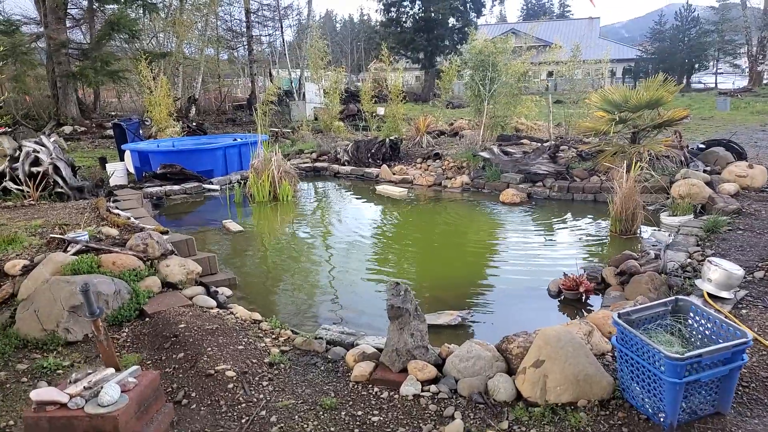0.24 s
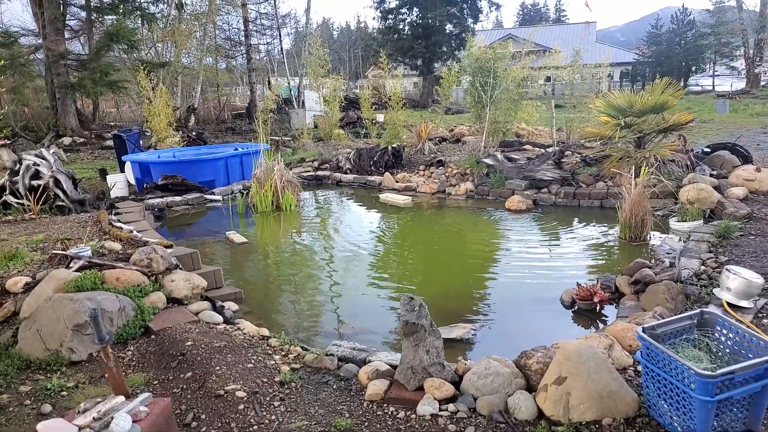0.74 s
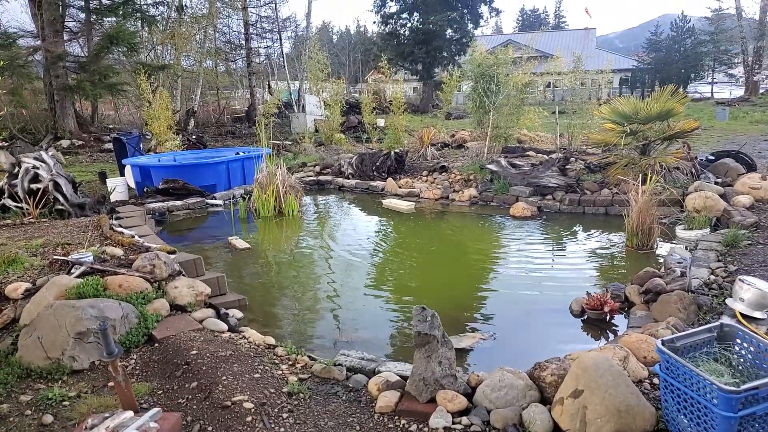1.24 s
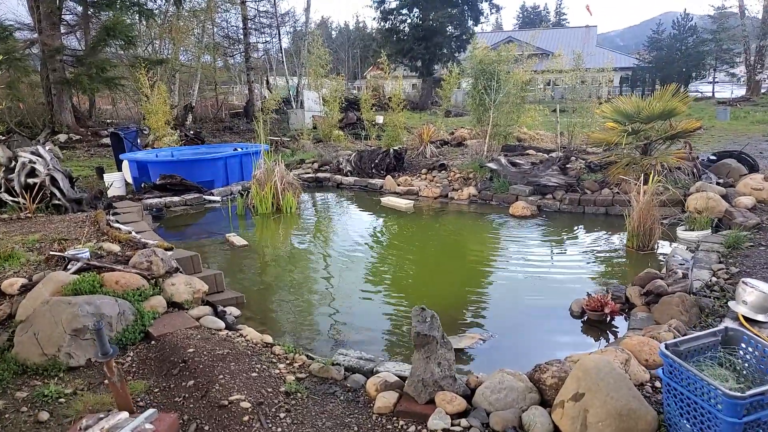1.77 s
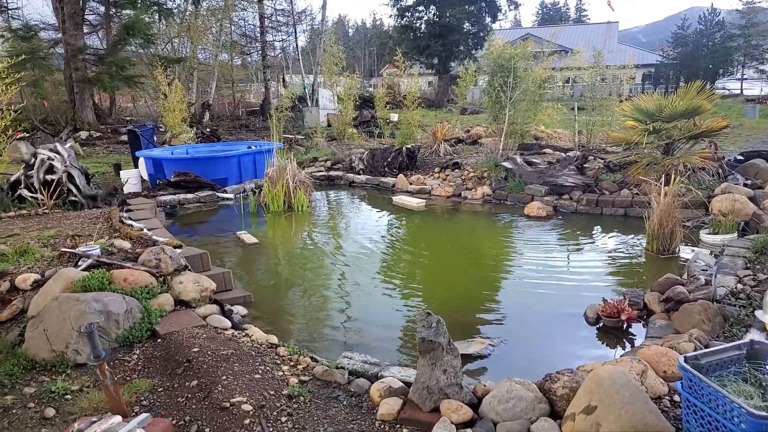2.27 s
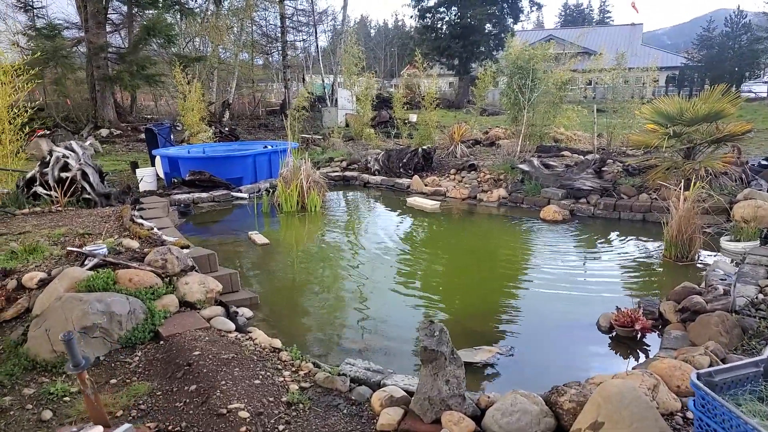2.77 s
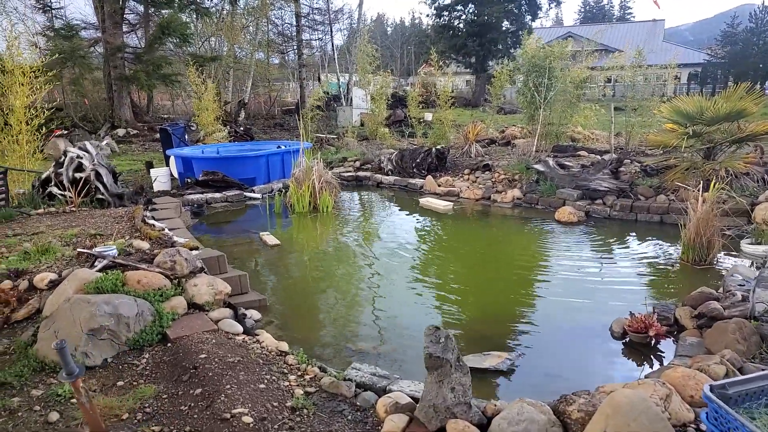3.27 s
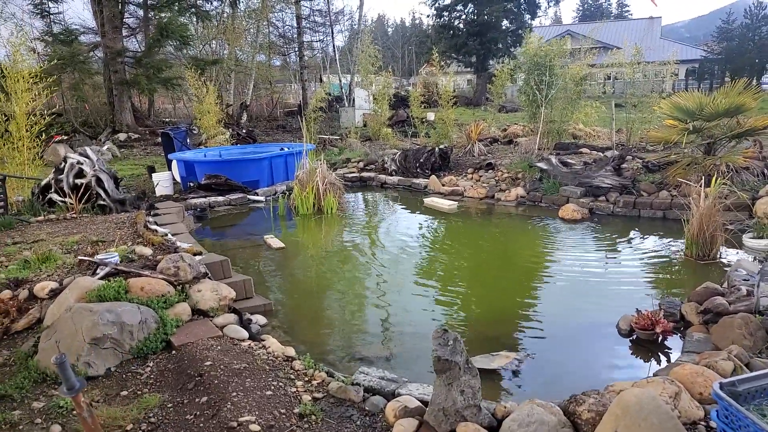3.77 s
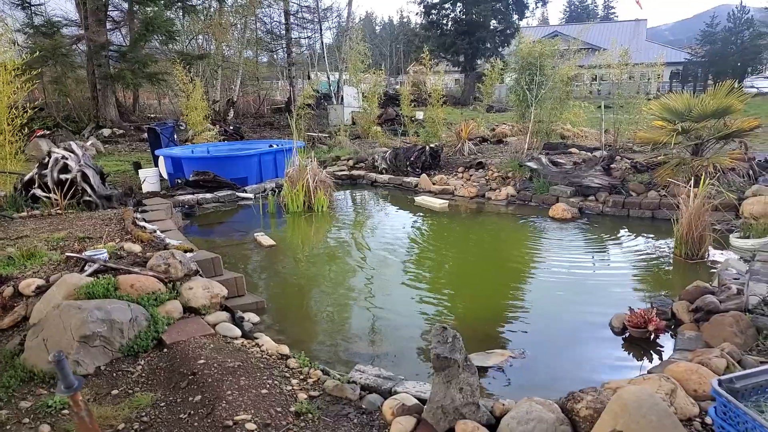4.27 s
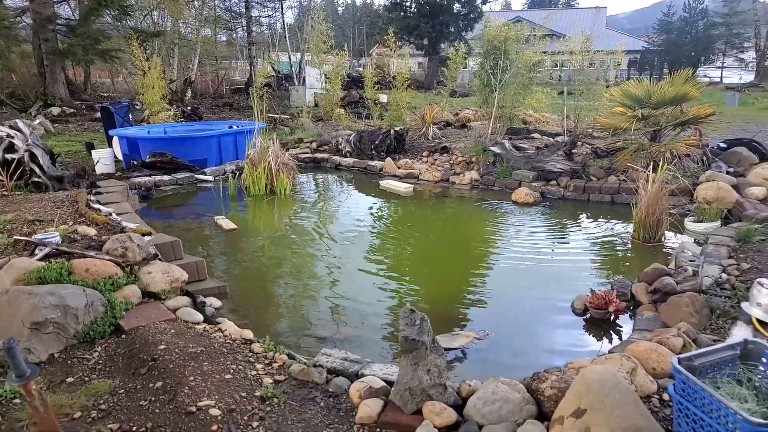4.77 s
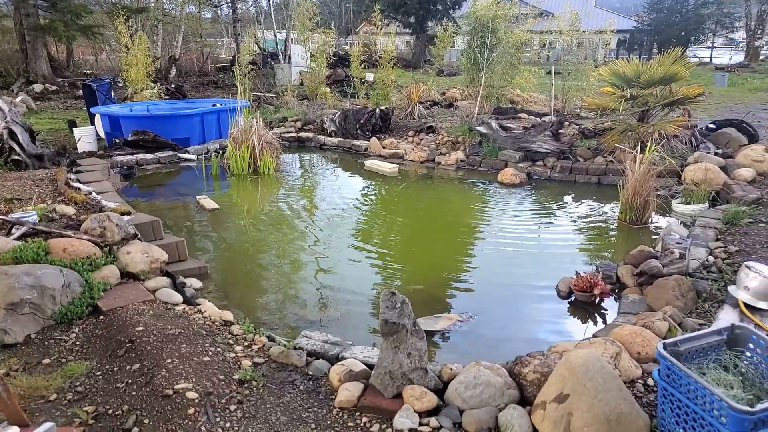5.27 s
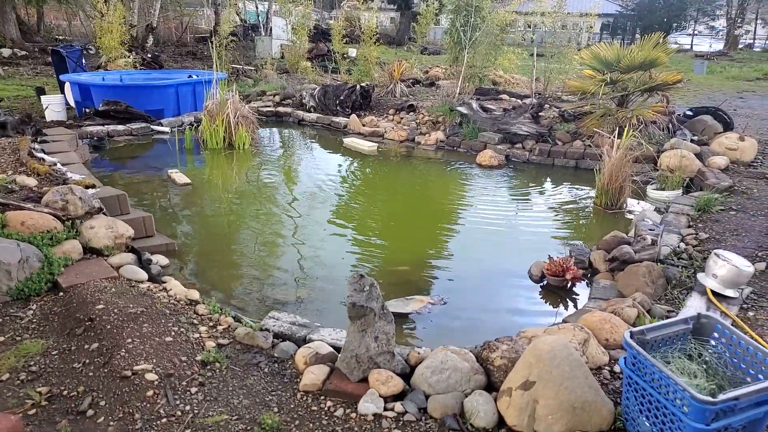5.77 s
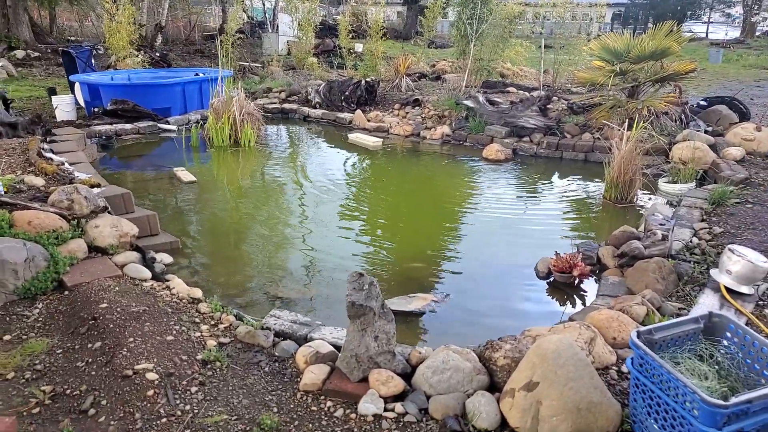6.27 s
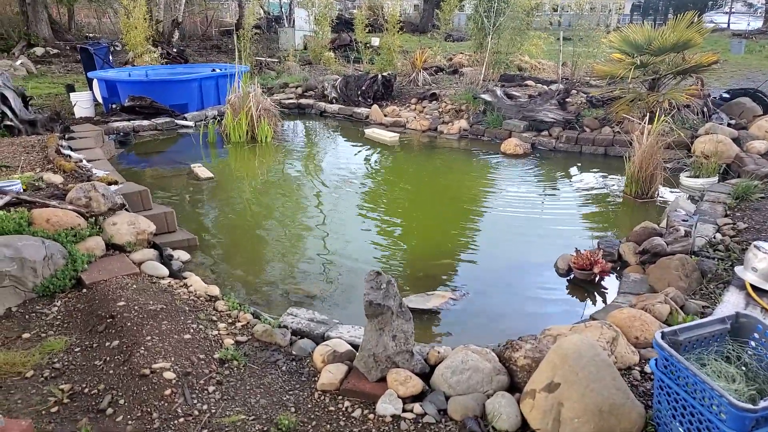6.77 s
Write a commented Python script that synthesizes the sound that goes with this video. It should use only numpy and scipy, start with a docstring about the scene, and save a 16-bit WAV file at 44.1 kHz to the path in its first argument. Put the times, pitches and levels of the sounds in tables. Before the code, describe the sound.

A quiet outdoor pond, heard through a hand-held stereo microphone. A near frog, slightly left, calls ribbit at about 0.2, 1.1, 2.0, 3.1, 3.9, 4.9 and 6.1 seconds: a rising, creaky rib of rapid pulses around 0.16 seconds long, then a brief, tighter bit, both ringing brightly near 2 kHz. A farther frog, lower, duller and softer, answers at 1.5, 2.5, 4.3, 5.5 and 6.7 seconds, with small grunts near 4.7 and 6.5. Rocks and trees add short scatter and a faint tail. Deep wind thumps flutter mainly from 0.9 to 2.3 seconds, the strongest near 1.5, lighter around 4 and almost calm after 5. A sleeve rubs and swishes softly throughout, mostly on the left, with a clearer airy swish around 4.5 and tiny ticks. A distant vehicle hum falls in pitch and fades, its road hush swelling gently around 2 to 3 seconds.

```python
"""Amid wind buffeting, a sleeve's rustle and a distant vehicle's hum, two frogs call "rib-bit" in turn.
The near frog's vocal sac rings on the second harmonic; the far one, its sac slack, croaks lower and duller.
Each syllable is a train of tone pulses from the larynx; rocks, a house and trees return delayed copies.
Wind and fabric are shaped noise on the two ports of a hand-held phone; the engine is a sum of shaft orders."""
import sys
import numpy as np
from scipy import signal
from scipy.fft import rfft, irfft
from scipy.io import wavfile
from scipy.ndimage import uniform_filter1d, map_coordinates

SR = 44100
rng = np.random.default_rng(int(sys.argv[2]) if len(sys.argv) > 2 else 0)


def unload_audio(sound):
    """Save the sound as a 16-bit wav file, at the path given as the first command line argument."""
    columns = np.transpose(np.atleast_2d(sound))
    # keep every value between -1 and 1, then stretch to whole-number steps
    steps = np.round(np.clip(columns, -1, 1) * 32767)
    wavfile.write(sys.argv[1], SR, steps.astype(np.int16))


N = 309582
TIME = np.arange(N) / SR
SIDES = np.array([[1], [-1]])  # left, right


def undb(db):
    """Amplitude ratio: a level in decibels becomes a linear gain."""
    return 10 ** (np.asarray(db) / 20)


def unit(x):
    """Normalisation: scale to an rms of 1."""
    return x / np.sqrt(np.mean(x ** 2) + 1e-20)


def follow(table, at):
    """Linear interpolation: join each column by straight lines along the first."""
    first, *columns = np.transpose(table)
    return [np.interp(at, first, column) for column in columns]


def colour(x, points):
    """Spectral filtering: weight x by (frequency [Hz], gain [dB]) points on a logarithmic axis."""
    size = x.shape[-1]
    hz, db = np.transpose(points)
    log_hz = np.log(np.fft.rfftfreq(size, 1 / SR) + 1)
    gain = undb(np.interp(log_hz, np.log(hz), db))
    return irfft(rfft(x) * gain, size)


def noise(points, channels=2):
    """Incoherent sources: independent coloured noise in each channel, with a joint rms of 1."""
    return unit(colour(rng.standard_normal((channels, N)), points))


def resonate(x, hz, width_hz):
    """Resonance: a single mode passes a band around its natural frequency."""
    return signal.lfilter(*signal.iirpeak(hz, hz / width_hz, fs=SR), x)


def walk(rate, size=N):
    """Slow random modulation: held random steps, smoothed twice, with a spread near 1."""
    hold = int(SR / rate)
    steps = np.repeat(rng.standard_normal(size // hold + 1), hold)
    smooth = uniform_filter1d(uniform_filter1d(steps, hold), hold)
    return smooth[:size] * np.sqrt(2)


def add(out, start, x):
    """Superposition: mix x into out from a start time in seconds."""
    i = max(int(start * SR), 0)
    out[i:i + len(x)] += x[:N - i]


# Spectrum of the quiet air: (frequency [Hz], relative level [dB])
AIR_SPECTRUM = [(350, -29.5), (600, -3), (706, -7), (820, 1), (1560, -7.5), (2160, -2), (2500, -19),
                (3520, -18.5), (7540, -29), (15500, -22.5)]


def quiet_air():
    """Diffuse background: steady noise, independent at the two ports."""
    return undb(-68.5) * noise(AIR_SPECTRUM)


def faint_hum():
    """Pure tone: one steady frequency whose level wavers slightly around -75 dB rms."""
    return unit(np.sin(2 * np.pi * 246.5 * TIME)) * undb(-75 + 2 * walk(5))


# Distant vehicle: (time [s], third shaft order [Hz], relative hum level [dB], relative road noise level [dB])
VEHICLE_COURSE = [(0, 161.3, -53.5, -72), (.8, 161.6, -51, -75), (1.7, 158.3, -58, -66),
                  (2.7, 155.1, -57, -62), (3.6, 143.4, -63, -68.5), (4.4, 131, -68.5, -68.5),
                  (5.4, 129.3, -56, -77.5), (6.3, 122.4, -63, -77.5), (7, 119.6, -68, -83.5)]
# Harmonics of the engine shaft: (shaft order [1], relative level [dB])
ENGINE_ORDERS = [(2, -22.5), (3, -2.5), (4, -15)]
# Spectrum of the road noise: (frequency [Hz], relative level [dB])
ROAD_SPECTRUM = [(100, -7), (190, -5), (250, 1), (380, 7), (600, -1), (1000, -11), (2000, -18.5),
                 (4000, -47.5)]


def vehicle(road_gain_db=5, hum_left_db=2, road_left_db=-10):
    """Harmonic source plus broadband noise: the engine hum sinks in pitch as road noise swells and fades."""
    hz, hum_db, road_db = follow(VEHICLE_COURSE, TIME)
    shaft_hz = hz * (1 + 0.0078 * walk(9.2)) / round(ENGINE_ORDERS[1][0])
    shaft = 2 * np.pi * np.cumsum(shaft_hz) / SR
    hum = np.zeros(N)
    for order, db in ENGINE_ORDERS:
        tone = unit(np.sin(round(order) * shaft))
        hum += tone * undb(hum_db + db + 2.5 * walk(5.5))
    road = noise(ROAD_SPECTRUM) * undb(road_db + road_gain_db + 2.88 * walk(6.8))
    # each left_db is the level difference, left minus right
    return hum * undb(hum_left_db * SIDES / 2) + road * undb(road_left_db * SIDES / 2)


# Spectrum of wind on a port: (frequency [Hz], relative level [dB])
WIND_SPECTRUM = [(15, -24.5), (25, -14), (42, -1.5), (60, 4.5), (90, -1), (130, -6), (200, -17.5),
                 (300, -23.5), (500, -46.5), (900, -87)]
# Steady breeze on the exposed left port: (time [s], relative level [dB])
BREEZE_COURSE = [(0.0, -44.5), (0.82, -51.5), (1.08, -40), (1.33, -44.5), (2.05, -43), (2.29, -47.5),
                 (2.77, -41.5), (3.66, -51.5), (4.4, -49.5), (5.1, -58.5), (5.81, -60), (6.3, -52.5),
                 (6.57, -61.5), (7.02, -63.5)]
# Eddies sweeping over the phone: (middle [s], length [s], relative level [dB], left minus right [dB])
PASSING_EDDIES = [(0.098, 0.037, -49, 5), (0.238, 0.0315, -39.5, -5), (0.682, 0.075, -42.5, -4.5),
                  (0.956, 0.0955, -32, -2), (1.061, 0.018, -34, -3.5), (1.161, 0.0258, -32.5, -4.5),
                  (1.526, 0.0257, -22.5, -4), (1.606, 0.1, -35, 6), (2.154, 0.0695, -39, 13.5),
                  (2.235, 0.0494, -29, -3.5), (2.786, 0.0266, -46, 27), (3.155, 0.083, -42.5, 10),
                  (3.686, 0.023, -37.5, 12), (3.955, 0.0775, -36.5, 4.5), (4.558, 0.101, -50, 21),
                  (5.45, 0.41, -62, -8.5), (6.103, 0.336, -58.5, 1), (6.334, 0.07, -47, -3.5),
                  (6.793, 0.0752, -48.5, 3.5)]


def wind(shared=0.54, flutter_db=3.0, breeze_db=6.5, shelter_db=-32):
    """Turbulent pressure: breeze and eddy powers add; the noise at the two ports is partly coherent."""
    breeze, = follow(BREEZE_COURSE, TIME)
    shelter = np.array([[0], [shelter_db]])  # the right port lies sheltered
    power = undb(breeze + breeze_db + shelter + flutter_db * walk(20)) ** 2
    for middle, length, db, left_db in PASSING_EDDIES:
        swell = np.exp(-2 * ((TIME - middle) / length) ** 2)
        power = power + (swell * undb(db + left_db * SIDES / 2)) ** 2
    common, *own = noise(WIND_SPECTRUM, channels=3)
    # shared is the fraction of power common to both ports
    turbulence = np.sqrt(shared) * common + np.sqrt(1 - shared) * np.array(own)
    return turbulence * np.sqrt(power)


# Spectra of the low rub and the high swish: (frequency [Hz], relative level [dB])
RUB_SPECTRUM = [(2500, -1.5), (3800, 0.5), (4900, 1.5), (6800, -4.5), (8500, -12.5), (12000, -23)]
SWISH_SPECTRUM = [(3000, -19), (4500, -6.5), (6000, -10.5), (10000, -1), (13000, 5.5), (15500, 0.5)]
# Light contact of the fabric between strokes: (time [s], relative level [dB])
LIGHT_CONTACT = [(0, -79.5), (1.7, -81), (3, -76.5), (6.3, -74.5), (6.65, -86.5), (7.02, -91.5)]
# Strokes: (start [s], length [s], relative low rub level [dB], rub centre [Hz], relative swish level [dB])
SLEEVE_STROKES = [(0, 0.204, -67.5, 5020, -88), (0.322, 0.664, -77.5, 6914, -68.5),
                  (.8, 0.646, -74.5, 6580, -99), (2.56, 0.352, -72.5, 4890, -79),
                  (3.596, 0.7, -78.5, 5050, -86.5), (4.317, 0.67, -68.5, 4390, -58.5),
                  (4.952, 0.383, -68, 4340, -74), (5.327, 0.62, -77, 4600, -71.5),
                  (6.035, 0.24, -65.5, 6290, -84.5)]
# Small creases of the fabric: (time [s], relative peak [dB])
FABRIC_CREASES = [(0.6458, -49.5), (0.659, -52.5), (0.829, -53.5), (2.4647, -57), (2.752, -50.5),
                  (2.7889, -52.5), (5.455, -47), (5.4778, -51.5), (6.3967, -56.5)]


def sleeve(rub_db=-1, swish_db=-2, ring_db=-1, ring_width_hz=450, contact_swish_db=-8, crease_db=-3,
           side_db=5.5, grain_db=2, attack_s=0.191, release_s=0.1265, fade_db_per_s=16,
           crease_decay_s=0.00135):
    """Friction noise: fabric slides in strokes that swell, slow and stop; creases tick as damped bursts."""
    rub = noise(RUB_SPECTRUM) * undb(rub_db)
    swish = noise(SWISH_SPECTRUM) * undb(swish_db)
    contact_db, = follow(LIGHT_CONTACT, TIME)
    slide = undb(contact_db) * (rub + undb(contact_swish_db) * swish)
    weave = rng.standard_normal((2, N))
    for start, length, low_db, hz, high_db in SLEEVE_STROKES:
        age = np.clip(TIME - start, 0, length)
        speed = np.minimum(age / attack_s, 1) * np.minimum((length - age) / release_s, 1)
        speed = speed * undb(-fade_db_per_s * age)
        ring = unit(resonate(weave, hz, ring_width_hz)) * undb(ring_db)
        slide = slide + speed * (undb(low_db) * (rub + ring) + undb(high_db) * swish)
    ticks = np.zeros(N)
    t = np.arange(SR // 50) / SR
    for start, db in FABRIC_CREASES:
        burst = rng.standard_normal(len(t)) * np.exp(-t / crease_decay_s)
        tick = resonate(burst, 7040, 6250)
        add(ticks, start, tick / np.abs(tick).max() * undb(db + crease_db))
    # left is raised and right lowered by side_db
    return (slide * undb(grain_db * walk(150)) + ticks) * undb(side_db * SIDES)


# Filtering by the trees: (frequency [Hz], gain [dB])
TREE_REFLECTION = [(500, -9.5), (1000, -14), (1750, -3), (2170, -0.5), (2700, -9), (3200, -11),
                   (12000, -11.5)]


def garden(x, left_db, lag_ms, rocks_db, house_db, house_s, trees_db, trees_t60_s=0.796, clump_db=4):
    """Reflection and reverberation: direct sound, rock scatter, a house echo and a fluttering tree tail."""
    t = np.arange(SR) / SR
    rocks, trees = rng.standard_normal((2, 2, SR))
    rocks = rocks * undb(-60 * t / .05) * (t > .001)  # reverberation time 0.05 s
    trees = colour(trees, TREE_REFLECTION)
    tail_db = -60 * t / trees_t60_s + clump_db * walk(90, size=SR)
    trees = trees * undb(tail_db) * np.minimum(t / 0.055, 1)
    paths = (undb(rocks_db) * unit(rocks) + undb(trees_db) * unit(trees)) / np.sqrt(SR)
    paths[:, int(house_s * SR)] += undb(house_db)
    # the right port hears the direct sound slightly later
    right = map_coordinates(x, [np.arange(N) - lag_ms * SR / 1000], order=3)
    direct = np.array([x, right]) * undb(left_db * SIDES / 2)
    return direct + signal.fftconvolve(x[None], paths, axes=1)[:, :N]


# How the frog's body radiates the fundamental: (frequency [Hz], gain [dB])
BODY_RADIATION = [(450, -16), (660, -6.5), (800, 5), (890, 0.5), (1040, -3.5), (1250, 1), (1700, -9.5),
                  (3000, -16.5)]
# The throat's upper resonance, which picks out the third harmonic: (frequency [Hz], gain [dB])
THROAT_RESONANCE = [(2000, -25.5), (2600, -8.5), (2950, 0), (3130, 0), (3260, -13), (3450, -22.5),
                    (4200, -25.5)]
# Rasp of the vocal folds: (frequency [Hz], relative level [dB])
RASP_SPECTRUM = [(400, -51), (750, 0), (1400, -1), (2500, 8.5), (3200, -4), (3700, -8.5), (5000, -20.5),
                 (8000, -27), (10000, -38.5), (15000, -50.5)]


def syllable(row, shape, slowing, sac_hz, sac_width_hz, third_db, upper_db, rasp_db, sag, jitter,
             high_band=None, high_band_db=-32, undertone_db=-2, undertone_ratio=.62, opening_s=0.001515,
             scatter_db=0.41, sac_peak=0.281):
    """Pulsed phonation: the larynx opens about 90 times a second, each time releasing a few cycles of tone."""
    _, length, rate, pitch_hz, level_db, sac_db = row
    t = np.arange(int((length + .03) * SR)) / SR
    share = t / length
    effort_db, bend, decay_s, leak_db = follow(shape, share)
    leak = undb(leak_db)
    count = rate * t * (1 - slowing * share / 2)
    pulse, cycle = count.astype(int), count % 1
    age = cycle / rate
    level_chance, pitch_chance = rng.standard_normal((32, 2))[pulse].T

    # each pulse swells and dies away; under high pressure the folds never quite shut
    opening = 1 - np.exp(-(age / opening_s) ** 2)
    gate = opening * np.exp(-np.maximum(age - opening_s, 0) / decay_s)
    closing = np.clip((length + .004 - t) / .004, 0, 1)
    effort = undb(effort_db + scatter_db * level_chance) * closing
    flow = uniform_filter1d(effort * (gate + leak), size=24)

    # the sac answers each pulse a little later with a rounder swell, and needs effort to get going
    hump = np.sin(np.interp(cycle, [0, sac_peak, 1], [0, np.pi / 2, np.pi])) ** 3
    swell = uniform_filter1d(effort ** 1.386 * (hump + leak / 2), size=24)

    # each pulse starts flat and rises to pitch; merged pulses hold it
    pulsed = np.clip(1 - leak, 0, 1)
    hz = pitch_hz * bend * (1 + pulsed * (jitter * pitch_chance - sag * np.exp(-age / 0.002)))
    phase = 2 * np.pi * np.cumsum(hz) / SR

    rasp_noise, band_noise = rng.standard_normal((2, len(t)))
    fundamental = colour(flow * np.sin(phase), BODY_RADIATION)
    sac = resonate(swell * np.sin(2 * phase), sac_hz, sac_width_hz)
    third = colour(flow * np.sin(3 * phase), THROAT_RESONANCE)
    overtones = flow * sum(np.sin(k * phase) / k ** 2 for k in range(4, 8))
    rasp = colour(rasp_noise * effort ** 0.594 * (gate + 0.13), RASP_SPECTRUM)

    # each part with its level above the fundamental [dB], set over the middle of the syllable
    parts = [(fundamental, 0), (sac, sac_db), (third, third_db), (overtones, upper_db), (rasp, rasp_db)]
    if high_band:
        # slow noise widens a gliding tone, and a second one below it, into narrow bands
        band_hz, loud_db = follow(high_band, share)
        waver = uniform_filter1d(band_noise, size=50)
        turn = 2 * np.pi * np.cumsum(band_hz) / SR
        pair = np.sin(turn) + undb(undertone_db) * np.sin(undertone_ratio * turn)
        parts.append((flow * undb(loud_db) * waver * pair, high_band_db))
    middle = (share > .35) & (share < .85)
    return sum(x / np.std(x[middle]) * undb(level_db + db) for x, db in parts)


# Far syllables: (start [s], length [s], starting pulse rate [1/s], pitch before bending [Hz],
# relative fundamental level [dB], vocal sac above fundamental [dB])
FAR_RIB_CALLS = [(1.4953, 0.1181, 82.95, 956.6, -47.5, 0), (2.503, 0.1365, 83.95, 960.9, -48, -3.5),
                 (4.326, 0.1223, 77.69, 916, -47.5, -4.5), (5.5117, 0.1253, 79, 896.9, -51.5, -5),
                 (6.6939, 0.0644, 86.27, 936.7, -49, -3)]
FAR_BIT_CALLS = [(1.683, 0.0625, 89.2, 1051, -46.5, -5), (2.7054, 0.0574, 94.92, 1059, -45, -5),
                 (4.511, 0.1125, 84.92, 1011, -44, -10.5), (5.707, 0.08185, 81.66, 1036, -47.5, -9.5),
                 (6.84, 0.0594, 94.5, 1038, -46.5, -9.5)]
# Course of a syllable: (share of length [1], relative level [dB], pitch ratio [1], pulse decay [s],
# leak between pulses [dB])
FAR_RIB_COURSE = [(0, -18.5, 1.2, 0.0014, -27.5), (0.3, -12, .96, 0.0013, -32),
                  (.55, -3, .98, 0.00076, -34.5), (.8, 0.5, 1.02, 0.001575, -33.5),
                  (1, -7, 1.0, 0.00035, -29)]
FAR_BIT_COURSE = [(0, -0.5, 0.986, 0.0015, -30), (.35, 0.5, 0.955, 0.0087, -22.5),
                  (0.603, -6.5, 0.998, 0.0033, -11), (.8, -11.5, 1.0, .003, -12),
                  (1, -22, 0.972, .003, -7.5)]
# Faint nasal band above the far croak, rising through each rib:
# (share of length [1], frequency [Hz], relative level [dB])
FAR_RIB_NASAL_BAND = [(0, 4521, -7), (1, 4860, 4.5)]
# Soft grunts: (start [s], relative peak [dB], pitch [Hz])
SOFT_GRUNTS = [(3.485, -73, 922), (4.727, -48, 1008), (6.528, -60, 966), (6.943, -62, 1044)]


def far_frog():
    """Heavily damped resonator: a slack sac dulls the lower croak; grunts are single damped pulses."""
    out = np.zeros(N)
    for row in FAR_RIB_CALLS:
        rib = syllable(row, FAR_RIB_COURSE, slowing=-.1, sac_hz=2100, sac_width_hz=1300, sac_peak=0.2,
                       third_db=-31, upper_db=-40, rasp_db=-22.5, sag=0.35, jitter=0.027,
                       high_band=FAR_RIB_NASAL_BAND, high_band_db=-29, undertone_db=-4, undertone_ratio=0.8)
        add(out, row[0], rib)
    for row in FAR_BIT_CALLS:
        bit = syllable(row, FAR_BIT_COURSE, slowing=0.1, sac_hz=2240, sac_width_hz=580, sac_peak=0.384,
                       third_db=-38.5, upper_db=-32.5, rasp_db=-15, sag=.16, jitter=0.047,
                       opening_s=0.00154, scatter_db=-0.94)
        add(out, row[0], bit)
    t = np.arange(SR // 20) / SR
    for start, db, hz in SOFT_GRUNTS:
        rise = t / 0.0042
        add(out, start, undb(db) * rise * np.exp(1 - rise) * np.sin(2 * np.pi * hz * t))
    return out


# Near syllables: (start [s], length [s], starting pulse rate [1/s], pitch before bending [Hz],
# relative fundamental level [dB], vocal sac above fundamental [dB])
NEAR_RIB_CALLS = [(0.2401, 0.1885, 89, 1055, -49, 17.5), (1.0552, 0.1684, 93.5, 1056, -47, 15),
                  (2.0211, 0.1602, 91.6, 1049, -48.5, 18.5), (3.0848, 0.1458, 84.3, 1057, -48, 17.5),
                  (3.857, .163, 91.6, 1051, -48, 11.5), (4.948, 0.1447, 89.8, 1064, -48.5, 9.5),
                  (6.1144, 0.1556, 93, 1042, -48.5, 7)]
NEAR_BIT_CALLS = [(0.4136, 0.10816, 88.95, 1080, -45, 16.38), (1.2264, 0.0857, 89.48, 1086, -44, 15.04),
                  (2.1944, 0.0992, 91.53, 1081, -43.5, 15.4), (3.261, 0.0834, 87.32, 1078, -44.5, 15.53),
                  (4.028, .091, 89.08, 1097, -44, 8.9), (5.121, 0.0849, 86.47, 1086, -46.5, 13.23),
                  (6.2855, 0.0903, 90.99, 1073, -46, 9.26)]
# Course of a syllable: (share of length [1], relative level [dB], pitch ratio [1], pulse decay [s],
# leak between pulses [dB])
NEAR_RIB_COURSE = [(0, -20.5, .93, 0.00088, -37.5), (0.201, -11, .97, 0.0017, -27.5),
                   (.45, -3.5, 1.005, 0.002, -27), (.65, -2, 1.02, 0.0025, -31),
                   (0.849, -5, 1.015, 0.0032, -35), (1.002, -12.5, 0.93, 0.0039, -35.5)]
NEAR_BIT_COURSE = [(0, -5, 1.01, 0.0017, -25.5), (0.25, -2, 1.01, 0.003, -24.5),
                   (0.5, 1.5, 1.03, 0.0024, -15.5), (0.7, -1, 1.0, 0.0017, -7.5),
                   (0.851, -8, .995, 0.0011, 0), (1, -32.5, 1.1, 0.0033, 3)]
# Thin whistle high above the near croak: (share of length [1], frequency [Hz], relative level [dB])
NEAR_RIB_WHISTLE = [(0, 13790, -30.5), (.6, 13690, -6), (1, 13210, 2.5)]
NEAR_BIT_WHISTLE = [(0, 13720, -4), (.55, 12760, 2), (1, 10660, 2)]


def near_frog():
    """Lightly damped resonator: a tight vocal sac rings on the second harmonic."""
    out = np.zeros(N)
    for row in NEAR_RIB_CALLS:
        rib = syllable(row, NEAR_RIB_COURSE, slowing=0.074, sac_hz=2202, sac_width_hz=190, sac_peak=0.283,
                       third_db=0, upper_db=-24.5, rasp_db=2.0, sag=.2, jitter=.008,
                       high_band=NEAR_RIB_WHISTLE, high_band_db=-30, undertone_db=3)
        add(out, row[0], rib)
    for row in NEAR_BIT_CALLS:
        bit = syllable(row, NEAR_BIT_COURSE, slowing=-.05, sac_hz=2162.4, sac_width_hz=144.32,
                       third_db=2, upper_db=-17.5, rasp_db=1.0, sag=0.20165, jitter=0.0084,
                       high_band=NEAR_BIT_WHISTLE, high_band_db=-26)
        add(out, row[0], bit)
    return out


def scene():
    """Superposition: background, wind, fabric and both frogs add at the two ports."""
    background = quiet_air() + faint_hum() + vehicle()
    far = undb(1.5) * garden(far_frog(), left_db=2.0, lag_ms=0.0616, rocks_db=-4.5,
                             house_db=-43, house_s=0.15, trees_db=-24.5)
    near = undb(2.5) * garden(near_frog(), left_db=3.5, lag_ms=0.0946, rocks_db=-8.5,
                              house_db=-41, house_s=0.088, trees_db=-32.0)
    return background + wind() + sleeve() + far + near


def record(dry):
    """Band limitation: a steep low-pass at the phone removes everything well above 15.7 kHz."""
    low_pass = signal.ellip(10, .2, 80, 15700, fs=SR, output="sos")
    return signal.sosfilt(low_pass, dry)


dry = scene()
out = record(dry)
unload_audio(out)
```